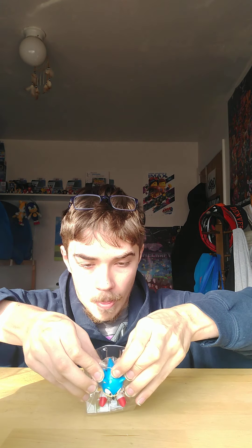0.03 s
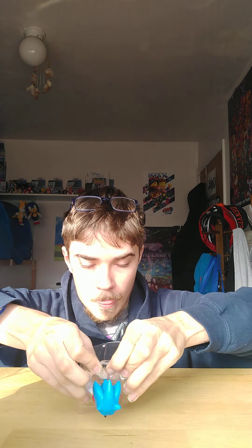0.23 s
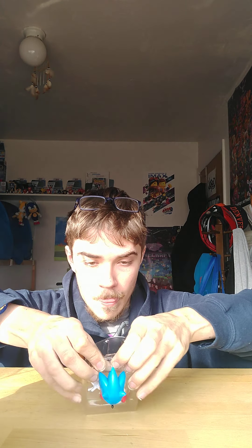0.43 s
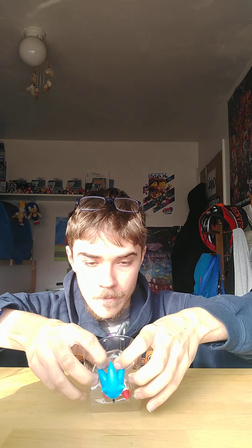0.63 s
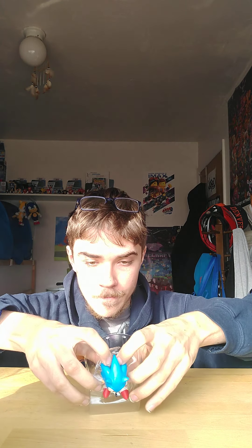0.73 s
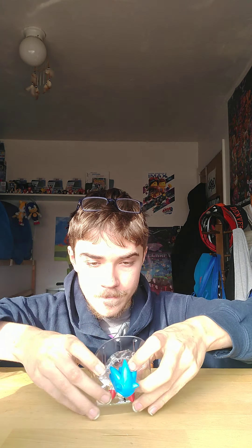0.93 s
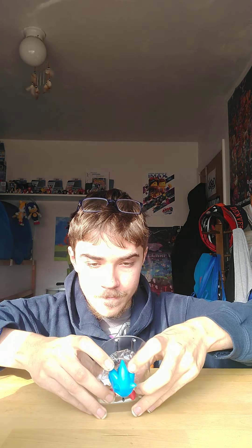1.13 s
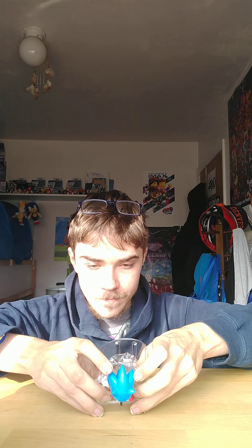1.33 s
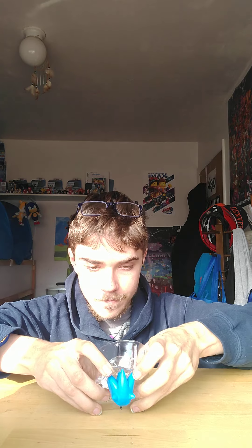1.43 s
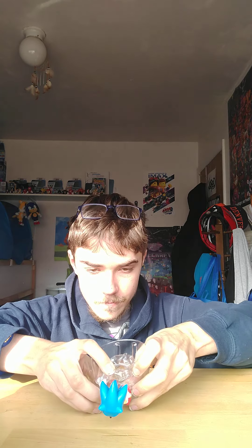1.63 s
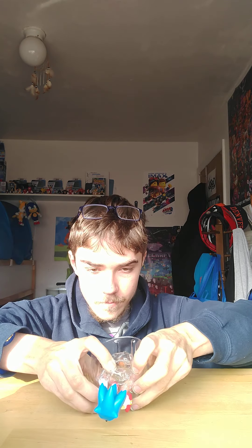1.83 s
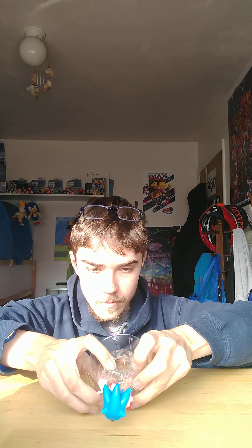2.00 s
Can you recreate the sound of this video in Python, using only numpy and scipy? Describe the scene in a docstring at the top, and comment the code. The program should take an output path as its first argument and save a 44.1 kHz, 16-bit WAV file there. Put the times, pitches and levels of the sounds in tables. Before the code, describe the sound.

Stiff clear plastic packaging crackles, snaps and pops as fingers pry out a small toy

```python
"""Buckling of a clear blister pack

Fingers pry a small toy out of a stiff clear blister pack, on a table in a small room.
Each buckle excites damped modes of the shell's walls and hollow belly; its crease adds a noisy crack and tick.
Between the snaps tiny creases crackle, the toy scrapes in dense slips, and once it knocks dully on the table.
Jolts ring the table, brief low rumbles decay, fingertips land softly, and hands shuffle as filtered noise
over faint room tone."""
import sys
import numpy as np
from scipy import signal
from scipy.fft import rfft, irfft
from scipy.io import wavfile

SR = 44100
rng = np.random.default_rng(int(sys.argv[2]) if len(sys.argv) > 2 else 0)


def dump_mix(stems):
    """Bounce the given channels to the path in sys.argv[1] as a 16-bit WAV at rate SR."""
    frames = np.atleast_2d(stems).T  # one column per channel
    limited = np.clip(frames, -1, 1)  # hard clip at full scale
    pcm = np.round(limited * 32767).astype(np.int16)
    wavfile.write(sys.argv[1], SR, pcm)


N = 91022  # length in samples

# Room tone spectrum: frequency_hz, relative_level_db
FLOOR_COLOUR = [(30, -12), (100, -2), (180, 2), (400, -4), (1300, -7), (2500, -20), (15000, -36)]
# Fingers and sleeves shuffling on the table: time_s, level_db
SHUFFLE_LEVEL = [(0, -50), (.13, -52), (.2, -42), (.34, -62), (.39, -51), (.52, -47), (.77, -48),
                 (.84, -60), (1.03, -68), (1.09, -46), (1.17, -66), (1.28, -68), (1.35, -51), (1.6, -50),
                 (1.755, -61), (1.83, -45), (1.92, -58), (2.06, -53)]
# Shuffle spectrum: frequency_hz, relative_level_db
SHUFFLE_SPECTRUM = [(30, -17), (90, -6), (175, 0), (280, -2), (500, -3), (1100, -6), (2000, -25),
                    (8000, -45)]
# Low rumble under some of the loud snaps: start_s, level_db
LOW_RUMBLES = [(0, -46), (.19, -50), (.28, -49), (1.607, -48), (1.805, -47)]
# Rumble spectrum: frequency_hz, relative_level_db
RUMBLE_SPECTRUM = [(40, 0), (120, -2), (300, -22), (1500, -70)]
# Decay time of the room: frequency_hz, t60_s
ROOM_DECAY = [(150, .26), (700, .2), (1400, .2), (3500, .22), (9000, .22), (15000, .13)]
# Strength of the room's tail: frequency_hz, relative_level_db
ROOM_SPECTRUM = [(150, -8), (400, -9), (900, -14.5), (1500, -13), (3000, -8.3), (8000, -7.5),
                 (15000, -12.5)]
# Left-right likeness of diffuse sound: frequency_hz, correlation (-1 to 1)
EAR_LIKENESS = [(100, -.3), (300, .55), (700, .95), (1300, .9), (2200, 0), (5000, -.1)]
# Jolts that ring the table: start_s, level_db
TABLE_BUMPS = [(.001, -31), (.182, -30), (.2805, -37), (.547, -40), (.8935, -31), (1.088, -45),
               (1.202, -39), (1.446, -43), (1.588, -41), (1.605, -27), (1.8052, -32), (1.8376, -40)]
# Table modes: nominal_frequency_hz, relative_level_db, t60_s
TABLE_MODES = [(172, -18, .08), (245, -11, .04), (330, -6, .028), (410, 0, .024), (490, 1, .02)]
# Fingertips landing softly: start_s, pitch_hz, level_db
FINGER_PADS = [(1.089, 255, -47), (1.616, 165, -46), (1.688, 245, -44)]
# The toy scraping along the plastic: start_s, end_s, level_db
TOY_SCRAPES = [(0, .07, -39), (.165, .27, -37), (.36, .79, -46), (1.4, 1.675, -40), (1.8, 2.06, -50)]
# Scrape spectrum: frequency_hz, relative_level_db
SCRAPE_SPECTRUM = [(500, -3), (1250, 7), (1950, -6), (2900, 0), (4600, -10), (7500, -4), (13000, -26)]
# Level of the fine crackle: time_s, level_db
CRACKLE_LEVEL = [(0, -36), (.07, -43), (.145, -50), (.19, -28), (.26, -37), (.31, -38), (.35, -44),
                 (.425, -45), (.5, -37), (.6, -49), (.72, -39), (.86, -51), (1.01, -70), (1.09, -56),
                 (1.18, -76), (1.26, -64), (1.35, -43), (1.39, -45), (1.47, -32), (1.555, -42), (1.6, -30),
                 (1.66, -34), (1.71, -52), (1.755, -58), (1.82, -36), (1.88, -38), (1.92, -52), (1.97, -48),
                 (2.06, -45)]
# The whole pack popping through: start_s, belly_pitch_hz, belly_level_db, wall_pitch_hz, wall_level_db
SHELL_POPS = [(.1187, 738, -19, 1315, -17), (.2428, 810, -25, 1490, -29), (.8958, 745, -32, 1590, -12),
              (1.1227, 810, -37, 1600, -36), (1.2025, 740, -29, 1560, -31)]
# Shell buckles: start_s, wall_pitch_hz, wall_level_db, belly_level_db, crack_level_db, tick_level_db
SHELL_SNAPS = [(0.0011, 1430, -14, -26, -21, -21), (0.0104, 1320, -26, -34, -29, -33),
               (0.0304, 1410, -27, -26, -26, -32), (0.0331, 1520, -23, -43, -25, -29),
               (0.0519, 1330, -26, -41, -33, -42), (0.0895, 1370, -26, -40, -36, -41),
               (0.1056, 1480, -25, -41, -30, -41), (0.1084, 1430, -26, -39, -35, -39),
               (0.164, 1500, -15, -28, -23, -30), (0.1697, 1490, -24, -39, -30, -35),
               (0.1821, 1330, -13, -20, -25, -31), (0.1854, 1360, -20, -33, -18, -27),
               (0.1959, 1380, -28, -47, -20, -30), (0.2057, 1430, -19, -25, -33, -40),
               (0.2139, 1290, -21, -41, -35, -39), (0.2549, 1280, -25, -34, -27, -40),
               (0.2804, 1360, -12, -31, -23, -29), (0.2854, 1350, -24, -29, -30, -38),
               (0.44, 1300, -29, -35, -44, -46), (0.4628, 1400, -25, -45, -34, -42),
               (0.4863, 1370, -31, -46, -38, -46), (0.4994, 1270, -31, -42, -36, -40),
               (0.5185, 1380, -28, -32, -34, -33), (0.5469, 1440, -14, -27, -28, -42),
               (0.606, 1330, -36, -48, -43, -41), (0.6138, 1450, -51, -45, -52, -33),
               (0.6366, 1400, -31, -40, -44, -44), (0.6558, 1360, -24, -31, -32, -44),
               (0.7036, 1360, -27, -37, -35, -40), (0.7111, 1460, -15, -30, -32, -39),
               (0.7423, 1400, -46, -39, -42, -37), (0.7469, 1460, -25, -36, -32, -29),
               (0.8114, 1460, -44, -50, -39, -39), (0.8294, 1450, -35, -41, -41, -62),
               (0.8487, 1380, -40, -43, -42, -36), (0.8935, 1450, -15, -17, -22, -37),
               (0.9507, 1340, -38, -43, -51, -55), (1.0011, 1540, -44, -53, -52, -65),
               (1.0389, 1300, -39, -46, -48, -56), (1.0713, 1420, -31, -39, -42, -54),
               (1.0883, 1460, -36, -39, -48, -67), (1.1227, 1590, -42, -48, -43, -64),
               (1.1983, 1520, -31, -43, -51, -55), (1.2027, 1350, -27, -35, -44, -62),
               (1.2887, 1560, -40, -48, -41, -55), (1.3265, 1410, -36, -51, -41, -51),
               (1.3416, 1450, -30, -33, -31, -40), (1.3722, 1490, -39, -35, -43, -53),
               (1.4013, 1470, -33, -37, -45, -41), (1.4087, 1390, -28, -41, -41, -42),
               (1.4264, 1320, -29, -24, -43, -49), (1.4314, 1450, -25, -39, -38, -43),
               (1.4459, 1480, -23, -24, -32, -43), (1.4569, 1460, -21, -38, -23, -39),
               (1.4648, 1510, -25, -48, -42, -46), (1.4755, 1530, -25, -36, -34, -35),
               (1.4864, 1500, -26, -52, -34, -39), (1.5019, 1530, -29, -47, -34, -41),
               (1.5145, 1490, -24, -37, -31, -33), (1.5189, 1390, -22, -42, -43, -51),
               (1.5416, 1350, -27, -39, -33, -40), (1.5624, 1380, -27, -41, -36, -40),
               (1.5717, 1380, -26, -36, -37, -44), (1.5769, 1330, -25, -34, -38, -38),
               (1.5878, 1470, -21, -34, -32, -37), (1.5929, 1410, -24, -44, -37, -41),
               (1.5979, 1340, -29, -28, -30, -34), (1.605, 1370, -11, -19, -26, -29),
               (1.6172, 1540, -18, -43, -21, -36), (1.6406, 1410, -36, -43, -34, -29),
               (1.6549, 1640, -29, -34, -35, -41), (1.6704, 1480, -31, -41, -37, -45),
               (1.6863, 1380, -27, -39, -44, -57), (1.7665, 1450, -20, -30, -27, -39),
               (1.7707, 1470, -27, -42, -34, -44), (1.8051, 1330, -18, -22, -26, -36),
               (1.8099, 1290, -31, -21, -37, -36), (1.8376, 1400, -25, -24, -36, -30),
               (1.8633, 1260, -40, -27, -43, -41), (1.8688, 1370, -32, -25, -45, -37),
               (1.8729, 1470, -29, -35, -39, -35), (1.8882, 1410, -33, -32, -46, -38),
               (1.9363, 1310, -36, -31, -39, -33), (1.9634, 1370, -35, -31, -42, -33),
               (1.9771, 1340, -34, -32, -45, -33), (2.0027, 1360, -30, -32, -45, -34),
               (2.0285, 1360, -27, -28, -43, -36), (2.0515, 1330, -35, -34, -55, -54)]
# Modes of the shell walls: nominal_frequency_hz, relative_level_db, t60_s
WALL_MODES = [(1060, -5, .028), (1210, 1, .038), (1315, 0, .04), (1400, -2, .03), (1510, -1, .03),
              (1630, 1, .04)]
# Modes of the hollow belly: nominal_frequency_hz, relative_level_db, t60_s
BELLY_MODES = [(545, -7, .033), (660, -7, .025), (738, 1, .035), (810, -1, .028), (865, -1, .028),
               (942, -1, .03)]
# Nominal crack spectrum: frequency_hz, relative_level_db
CRACK_SPECTRUM = [(1500, -25), (1850, -9), (2090, 0), (2400, -4), (2850, 1), (3300, -5), (3900, -11),
                  (4800, -19), (6300, -26), (9000, -45)]
# Nominal tick spectrum: frequency_hz, relative_level_db
TICK_SPECTRUM = [(2500, -26), (4300, -8), (5000, -8), (5900, -3), (6700, -2), (7800, 5), (8800, -2),
                 (9500, -3), (9950, 0), (10450, -7), (11000, -2), (11900, -13), (13200, -11), (14100, -15),
                 (15000, -13), (16000, -30)]

# Background
FLOOR_DB, RUMBLE_T60_S, EDGE_HZ = -68, .16, 15900
# A small thin shell radiates little bass
SHELL_CUT_HZ, TABLE_CUT_HZ = 400, 130
# Modes start nearly in step, and each mode's pitch varies at random by a small fraction
RISE_S, PITCH_SPREAD, PHASE_SCATTER_CYCLES = .0007, .012, .22
# Share of each ringing that differs between the ears
WALL_WIDTH, BELLY_WIDTH, TABLE_WIDTH = .27, .09, .3
# The buckling patch rings at its own pitch, beside the other modes at this gain
DENT_T60_S, OTHER_MODES_GAIN = .022, .9
# Crease noise: decay, tilt (raised at left, lowered at right) and spread of its spectrum
CRACK_T60_S, CRACK_TILT_DB, CRACK_SPREAD_DB = .022, 1.6, 2.2
TICK_T60_S, TICK_TILT_DB, TICK_SPREAD_DB = .008, 3.2, 3.5
TICK_RING_T60_S, TICK_RING_DB = .04, -12
# While the shell hangs slack its cracks are dull
SLACK_FROM_S, SLACK_TO_S, SLACK_HZ, SLACK_DB_PER_OCTAVE = .88, 1.32, 2700, -6
# The sheet settles in a few smaller jerks
SETTLE_DB, SETTLE_FROM_S, SETTLE_TO_S = -13, .003, .024
# Fine crackle: total rate, spread of sizes, and levels relative to the wall
CRACKLE_PER_S, CRACKLE_SPREAD_DB = 560, 3.7
CRACKLE_BELLY_DB, CRACKLE_CRACK_DB, CRACKLE_TICK_DB = -8.5, -6, -9.5
# Scrape, pops, fingertips and knock
SLIPS_PER_S, SLIP_SPREAD_DB, SCRAPE_TILT_DB = 1300, 4, 2
POP_T60_S, POP_WALL_T60_S, POP_RISE_S = .036, .022, .001
PAD_T60_S, PAD_RISE_S = .045, .004
KNOCK_S, KNOCK_HZ, KNOCK_DB, KNOCK_T60_S = 1.6046, 600, -16, .007


def amp(db):
    """Logarithmic level: decibels become a pressure gain."""
    return 10 ** (np.asarray(db) / 20)


def read(points, hz):
    """Logarithmic pitch scale: a table is interpolated along log frequency."""
    table_hz, value = np.transpose(points)
    return np.interp(np.log(hz + 1), np.log(table_hz), value)


def level_curve(points):
    """Amplitude modulation: a level drawn through its table over the whole scene."""
    return amp(np.interp(np.arange(N) / SR, *np.transpose(points)))


def add(mix, start_s, sound):
    """Superposition: a stereo sound adds to the mix from its start time."""
    part = mix[:, max(round(start_s * SR), 0):][:, :sound.shape[1]]
    part += sound[:, :part.shape[1]]


def struck(x, size=220):
    """Onset power: a sound is scaled to unit power over its first five milliseconds."""
    return x / np.sqrt(np.mean(x[..., :size] ** 2) + 1e-20)


def colour(x, points, size=2048):
    """Minimum-phase filtering: the phase is the Hilbert transform of the log gain."""
    hz = abs(np.fft.fftfreq(size, 1 / SR))
    log_gain = np.log(amp(read(points, hz)))
    spectrum = np.exp(np.conj(signal.hilbert(log_gain)))
    taps = np.fft.ifft(spectrum).real[:size // 4]
    return signal.fftconvolve(x, taps[None], axes=1)[:, :x.shape[1]]


def highpass(x, cut_hz):
    """Weak low-frequency radiation: the bass below the cut is taken away."""
    return signal.sosfilt(signal.butter(3, cut_hz, btype="high", fs=SR, output="sos"), x)


def clock(size=4096):
    """Sampled time: the time axis of one short event, in seconds."""
    return np.arange(size) / SR


def correlate(z, hz):
    """Interaural coherence: the right spectrum shares a frequency-dependent part of the left."""
    same = np.clip(read(EAR_LIKENESS, hz), -1, 1).reshape((-1,) + (1,) * (z.ndim - 2))
    return np.array([z[0], same * z[0] + np.sqrt(1 - same ** 2) * z[1]])


def noise(points):
    """Spectral shaping: coloured stereo noise of unit power, most alike at the ears in the midrange."""
    hz = np.fft.rfftfreq(N, 1 / SR)
    spectra = correlate(rfft(rng.standard_normal((2, N))), hz)
    x = irfft(spectra * amp(read(points, hz)), N)
    return x / x.std()


def room_tone():
    """Stationary noise: a faint, steady, coloured background."""
    return amp(FLOOR_DB) * noise(FLOOR_COLOUR)


def shuffle():
    """Friction noise: dull rubbing of the hands as they shift their grip."""
    return noise(SHUFFLE_SPECTRUM) * level_curve(SHUFFLE_LEVEL)


def rumbles():
    """Exponentially decaying noise: a brief low rumble begins at each listed time."""
    t = np.arange(N) / SR
    envelope = np.zeros(N)
    for start, db in LOW_RUMBLES:
        envelope += (t >= start) * amp(db - 60 * abs(t - start) / RUMBLE_T60_S)
    return noise(RUMBLE_SPECTRUM) * envelope


def room(x, size=22050):
    """Diffuse reverberation: convolution with noise that decays at each frequency's own rate."""
    hz, t, z = signal.stft(rng.standard_normal((2, size)), SR, nperseg=256)
    z = correlate(z, hz)
    t60 = read(ROOM_DECAY, hz)[:, None]
    decay = amp(read(ROOM_SPECTRUM, hz)[:, None] - 60 * t / t60)
    z *= decay * np.sqrt(2 * np.log(1000) / (t60 * SR))  # evens the tail's energy across decay times
    tail = signal.istft(z, SR, nperseg=256)[1]
    # the tail fades in from 2 to 6 ms
    tail *= np.clip((np.arange(tail.shape[1]) / SR - .002) / .004, 0, 1)
    return signal.fftconvolve(x, tail, axes=1)[:, :N]


def ring(modes, width, dent_hz=None):
    """Modal superposition: damped modes set off together; a dent adds its own note."""
    t = clock()
    hz, db, t60 = np.transpose(modes)
    hz = hz * (1 + PITCH_SPREAD * rng.standard_normal(len(hz)))
    decay = amp(db[:, None] - 60 * t / t60[:, None])
    waves = decay * np.exp(2j * np.pi * hz[:, None] * t)
    # near-equal phases for the common part, random phases for the ear difference
    phases = np.array([PHASE_SCATTER_CYCLES * rng.standard_normal(len(hz)), rng.random(len(hz))])
    mid, side = (np.exp(2j * np.pi * phases) @ waves).imag
    mid = struck(mid)
    if dent_hz:
        dent = amp(-60 * t / DENT_T60_S) * np.sin(2 * np.pi * dent_hz * t)
        mid = OTHER_MODES_GAIN * mid + struck(dent)
    pair = struck(mid) + width * np.array([[1], [-1]]) * struck(side)
    return struck(pair * (1 - np.exp(-(t / RISE_S) ** 2)))


def note(hz, t60, rise):
    """Single damped resonance: one decaying sine, the same at both ears."""
    t = clock()
    wave = amp(-60 * t / t60) * np.sin(2 * np.pi * hz * t)
    wave = struck(wave * (1 - np.exp(-t / rise)))
    return np.array([wave, wave])


def table_contacts():
    """Impact excitation: jolts ring the table's modes and fingertips give soft damped notes."""
    table = np.zeros((2, N))
    for start, db in TABLE_BUMPS:
        add(table, start, amp(db) * ring(TABLE_MODES, TABLE_WIDTH))
    for start, hz, db in FINGER_PADS:
        add(table, start, amp(db) * note(hz, PAD_T60_S, PAD_RISE_S))
    return table


def scrape(length_s):
    """Stick-slip friction: dense, uneven slips of the toy against the creased plastic."""
    t = np.arange(0, length_s, 1 / SR)
    sizes = amp(SLIP_SPREAD_DB * np.minimum(rng.exponential(1, len(t)), 3))
    slips = (rng.random(len(t)) < SLIPS_PER_S / SR) * sizes
    rasp = colour(slips * rng.standard_normal((2, len(t))), SCRAPE_SPECTRUM)
    swell = np.sqrt(np.sin(np.pi * t / length_s))
    return rasp / rasp.std() * swell * amp([[SCRAPE_TILT_DB], [-SCRAPE_TILT_DB]])


def crackle(count=24):
    """Random point process: swarms of tiny buckles while the fingers work the plastic."""
    out = np.zeros((2, N))
    for _ in range(count):
        tick_db = CRACKLE_TICK_DB + 3 * rng.standard_normal()
        grain = snap(rng.uniform(1100, 1640), 0, CRACKLE_BELLY_DB, CRACKLE_CRACK_DB, tick_db)
        sizes = amp(CRACKLE_SPREAD_DB * np.minimum(rng.exponential(1, N), 3))
        hits = sizes * (rng.random(N) < CRACKLE_PER_S / count / SR)
        out += signal.oaconvolve(hits[None], grain, axes=1)[:, :N]
    return out / out.std() * level_curve(CRACKLE_LEVEL)


def knock():
    """Heavy damping: one short, dead knock of the toy."""
    return amp(KNOCK_DB) * note(KNOCK_HZ, KNOCK_T60_S, RISE_S)


def pop(belly_hz, belly_db, wall_hz, wall_db):
    """Snap-through: the whole pack pops with two hollow notes, belly and wall."""
    belly = amp(belly_db) * note(belly_hz, POP_T60_S, POP_RISE_S)
    return belly + amp(wall_db) * note(wall_hz, POP_WALL_T60_S, POP_RISE_S)


def burst(envelope, points, tilt_db, spread_db):
    """High modal density: a giving crease sounds as noise, different at each ear, in its own colour."""
    grains = rng.standard_normal((2, len(envelope))) * envelope
    hz, db = np.transpose(points)
    own_colour = np.transpose([hz, db + spread_db * rng.standard_normal(len(hz))])
    return struck(colour(grains, own_colour) * amp([[tilt_db], [-tilt_db]]))


def settle(body, count=3):
    """Repeated excitation: weaker, unevenly spaced repeats roughen the decay of a buckle."""
    out = body.copy()
    for delay in rng.uniform(SETTLE_FROM_S, SETTLE_TO_S, count):
        gain = amp(SETTLE_DB * (.5 + delay / SETTLE_TO_S))
        add(out, delay, gain * rng.choice([-1, 1]) * body)
    return out


def snap(wall_hz, wall_db, belly_db, crack_db, tick_db, slack=False):
    """Elastic buckling: a sudden jump rings wall and belly while the crease cracks and ticks."""
    t = clock()
    crack_colour = CRACK_SPECTRUM
    if slack:
        crack_colour = [(hz, db + SLACK_DB_PER_OCTAVE * max(np.log2(hz / SLACK_HZ), 0))
                        for hz, db in CRACK_SPECTRUM]
    crack = burst(amp(-60 * t / CRACK_T60_S), crack_colour, CRACK_TILT_DB, CRACK_SPREAD_DB)
    # a quick tick with a weaker, longer ring
    tick_decay = amp(-60 * t / TICK_T60_S) + amp(TICK_RING_DB - 60 * t / TICK_RING_T60_S)
    tick = burst(tick_decay, TICK_SPECTRUM, TICK_TILT_DB, TICK_SPREAD_DB)
    wall = amp(wall_db) * ring(WALL_MODES, WALL_WIDTH, wall_hz)
    belly = amp(belly_db) * ring(BELLY_MODES, BELLY_WIDTH)
    return settle(wall + belly) + amp(crack_db) * crack + amp(tick_db) * tick


def scene():
    """Linear superposition: pack and table sound in the room, over rumbles, shuffling and room tone."""
    background = room_tone() + shuffle() + rumbles()
    table = table_contacts()
    shell = crackle()
    for start, end, db in TOY_SCRAPES:
        add(shell, start, amp(db) * scrape(end - start))
    add(shell, KNOCK_S, knock())
    for start, *settings in SHELL_POPS:
        add(shell, start, pop(*settings))
    for start, *settings in SHELL_SNAPS:
        add(shell, start, snap(*settings, slack=SLACK_FROM_S < start < SLACK_TO_S))
    pack = highpass(shell, SHELL_CUT_HZ) + highpass(table, TABLE_CUT_HZ)
    return pack + room(pack) + background


def record(dry):
    """Amplitude and band limiting: clipping at full scale, then a linear-phase lowpass."""
    lowpass = signal.firwin(255, EDGE_HZ, window=("kaiser", 8), fs=SR)
    return signal.oaconvolve(np.clip(dry, -1, 1), lowpass[None], "same")


dry = scene()
out = record(dry)
dump_mix(out)
```